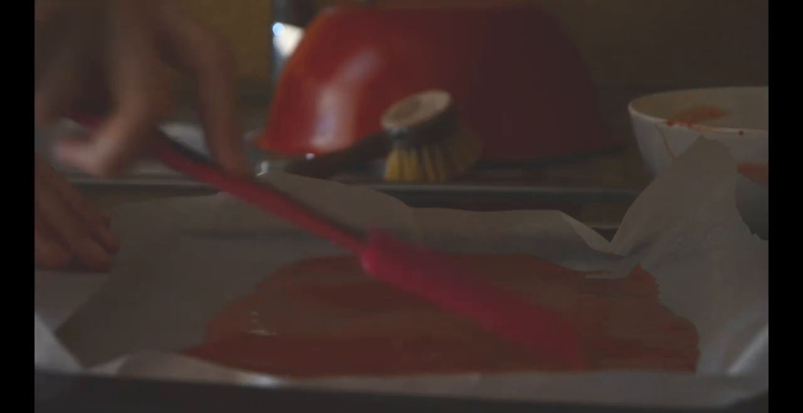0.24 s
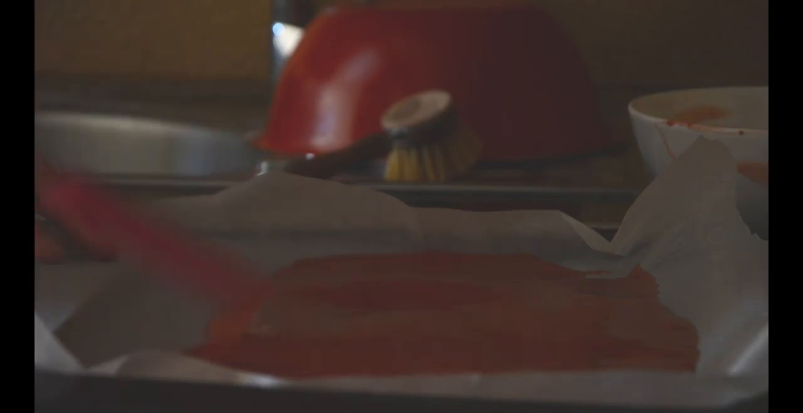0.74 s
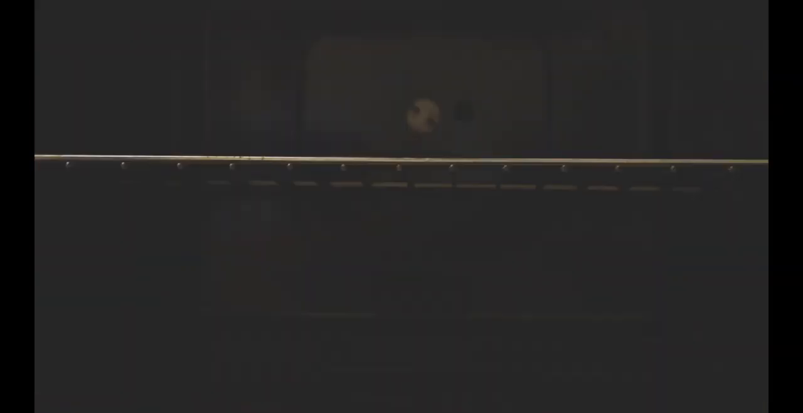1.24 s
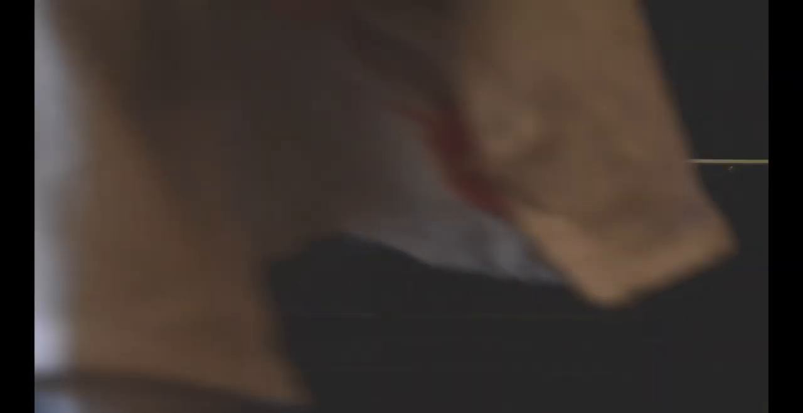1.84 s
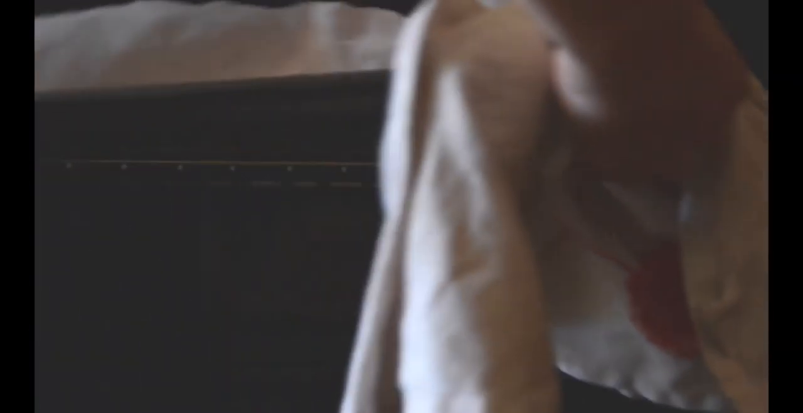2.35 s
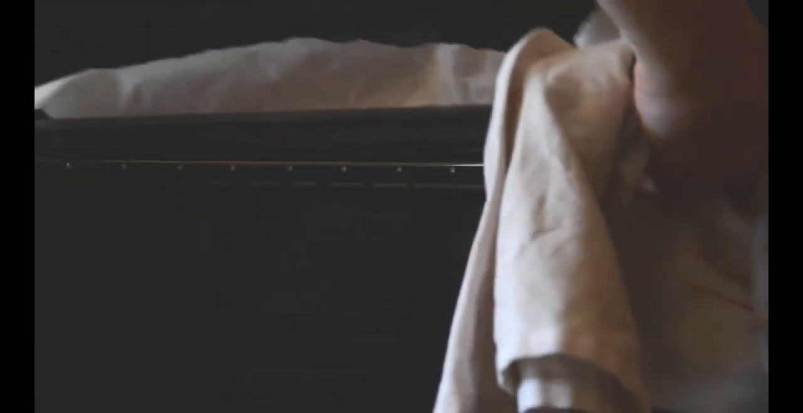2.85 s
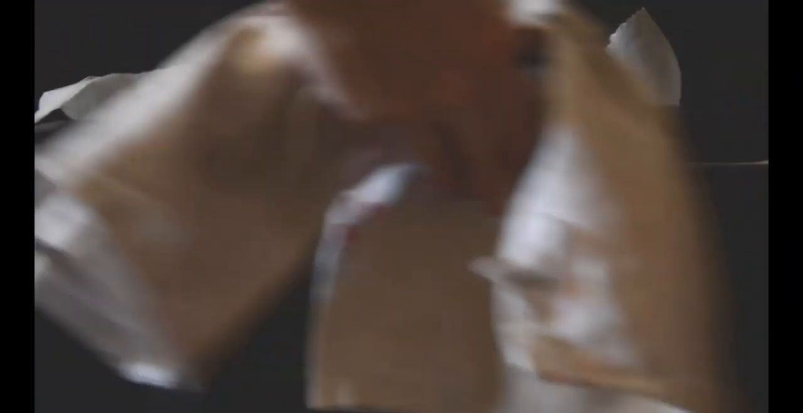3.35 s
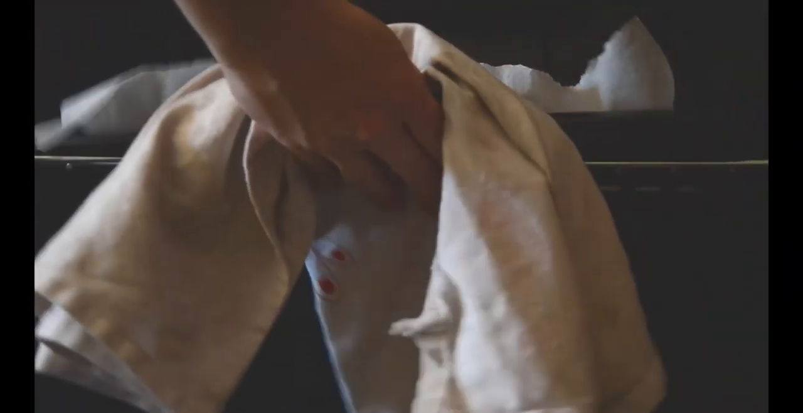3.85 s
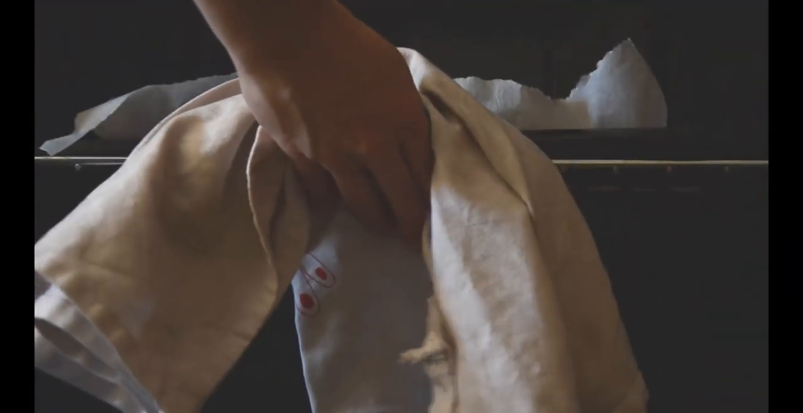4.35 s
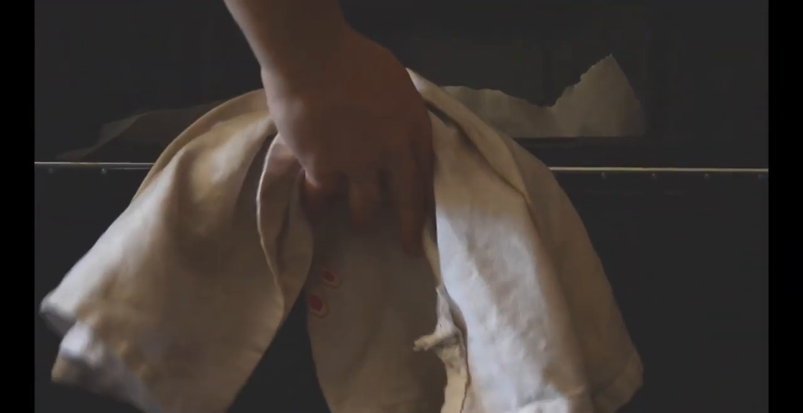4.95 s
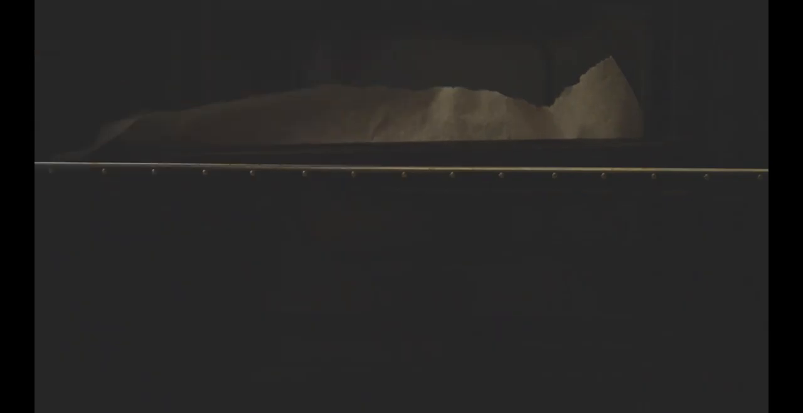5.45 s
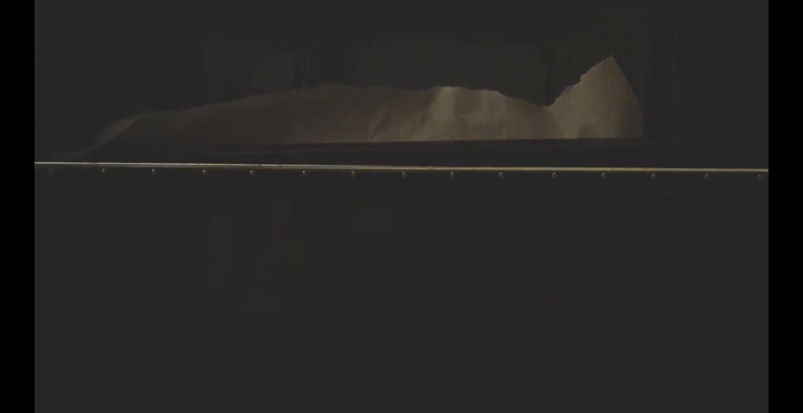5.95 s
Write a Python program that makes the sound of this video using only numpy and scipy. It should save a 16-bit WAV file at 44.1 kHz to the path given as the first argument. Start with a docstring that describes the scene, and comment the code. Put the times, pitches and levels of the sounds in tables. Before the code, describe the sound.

Faint dabs in a quiet kitchen cut to oven fan hush; a thin tray bangs, rattles, slides over rods and ends with a loud clank.

```python
"""A spatula pats a paste on baking paper; then a metal tray is set on an oven rack, rattles and slides over
the rods and clanks home. One contact force, made of blows and drags, shakes tray sheet, rim and oven walls;
bars, rods, squeals and the clank ring beside them, and cloth and hand brush the oven front.
The scene cuts from the hush at the counter to the open oven with its fan; a thin electric whine lies below
throughout. Noises are filtered and shaped; modes are resonators set ringing."""
import sys
import numpy as np
from scipy import signal
from scipy.fft import rfft, irfft, next_fast_len
from scipy.io import wavfile

SR = 44100
rng = np.random.default_rng(int(sys.argv[2]) if len(sys.argv) > 2 else 0)


def boost(x):
    """Linear amplitude factor 10**(x/20) for a level x in decibels (scalar or array-like)."""
    u = np.asarray(x, float) / 20
    return 10 ** u


def store_wav(level_fs):
    """Save 16-bit WAV to argv[1]."""
    pcm = np.round(np.clip(np.atleast_2d(level_fs), -1, 1) * 32767)
    wavfile.write(sys.argv[1], SR, pcm.T.astype(np.int16))


N = 273810
T = np.arange(N) / SR   # s

# All levels are relative, ahead of the final recording gain.
# Metal blows on metal. Each row: start in seconds, force in dB, hardness in dB per octave, oven share in dB.
BLOWS = [(2.0301, -42.5, 2, -9), (2.1003, -16, 1.75, -8), (2.1382, -27.5, -0.6, -2),
         (2.1913, -30.5, -0.6, -7), (2.398, -29, 0, 4), (2.4549, -11.5, 1.3, -4), (2.4935, -25, 5.5, -2.5),
         (2.567, -16.5, 3, 4.5), (2.585, -14, 3, -7), (2.6351, -17, 2.5, -1.5), (2.6937, -18.5, 2.3, -18),
         (2.9438, -31, 0, -19), (2.9907, -41, 0.8, 5), (3.6393, -56, 2, 6), (3.7587, -41, 1, 10),
         (3.8786, -16, 2, 9), (3.8814, -10.5, 1.7, -5), (3.8947, -14.5, 5, -1), (3.9095, -17, 3.5, -24),
         (3.9542, -22.5, 2.2, 5), (3.9837, -22.5, 2.5, -2), (4.0188, -33, 4, 11.5), (4.0836, -27, 2.5, 9),
         (4.119, -36, -5.5, 7), (4.3032, -35, -2.7, -1), (4.346, -35, -1, 3), (4.8411, -5, -0.7, -7)]
# Three strokes of the tray over the rods.
# Each row of a stroke: time in seconds, force on the sheet in dB, push on the cross-bars in dB.
DRAGS = [
    [(2.47, -18.5, -99), (2.522, -45, -89), (2.558, -33, -82), (2.67, -31.5, -82), (2.79, -43, -71),
     (2.94, -46.5, -102), (3.0, -57.5, -74), (3.12, -77, -108), (3.264, -73, -92), (3.33, -72, -105)],
    [(3.34, -72, -97), (3.53, -59, -98.5), (3.604, -69, -105), (3.64, -57, -85), (3.686, -46, -90),
     (3.786, -47, -82.5), (3.83, -49, -94), (3.87, -39, -77)],
    [(3.9, -27, -63), (4.026, -33.5, -69), (4.058, -49.5, -75.5), (4.208, -62, -100), (4.256, -52, -86),
     (4.35, -43.5, -82), (4.43, -43, -102), (4.49, -42, -91), (4.6, -42, -100), (4.69, -40.5, -85),
     (4.784, -44, -101), (4.81, -39.5, -83), (4.83, -53, -88)],
]
# Hardness of each stroke at a force of -40 dB. Each entry: hardness in dB per octave.
DRAG_HARD_DB = [2, 1.5, 3]
DRAG_HARD_PER_DB = 0.2004   # a harder push scrapes brighter: dB per octave, per dB of force
# Share of each stroke that reaches the oven walls. Each entry: share in dB.
DRAG_OVEN_DB = [2.5, 2, 0]
# A contact lasts longer the softer it is; it opens with one clean click, then grits.
CONTACT_DECAY_MS, CONTACT_DECAY_MS_PER_DB = 2.25, 0.09765
FIRST_TOUCH_DB, GRIT_DB = 14, 3
RATTLE_DB, RATTLE_HZ = 5, 45   # the dragged tray hops, so its force comes in clumps

# Energy that the tray sheet gives back. Each row: frequency in Hz, relative level in dB per Hz.
TRAY = [(35, -38), (60, -62), (146, 4.5), (202, -9), (307, -4), (406, -5), (436, 0), (501, -15.5), (563, 0),
        (986, -4.5), (1220, -0.5), (2950, -19), (6230, -49), (12000, -51.5), (15800, -73)]
# Slow dying away of sheet and oven together. Each row: frequency in Hz, t60 in seconds.
TRAY_T60 = [(80, 0.41), (250, 1), (700, 0.68), (1800, 0.5), (4500, 0.33), (9000, 0.091), (15000, 0.21)]
EDGES = 50 * 2 ** np.arange(0, 8.4, 1 / 3)   # third-octave edges of the sheet, Hz
# Clearest modes of the tray rim. Each row: frequency in Hz, level in dB, t60 in seconds.
RIM = [(555.4, 0, 0.52), (731, 0, 0.45), (1171, -4, 0.39), (1400, -5, 0.23), (1427, -6, 0.23),
       (1843, -1.5, 0.36), (2018, -1.5, 0.14), (3150, -34, 0.22), (3720, -13.5, 0.15)]
# Oven walls. Each row: frequency in Hz, level in dB, t60 in seconds.
OVEN = [(139, -7, 0.25), (162, -18.5, 0.35), (161, 2.5, 0.49), (208, -24, 0.94), (239, -6, 1),
        (256.8, -11.5, 0.99), (312.8, 5.5, 0.21)]
# Cross-bars that hum under the drag. Each row: frequency in Hz, level in dB, t60 in seconds.
BARS = [(454.4, 4.5, 0.5), (450.5, 3.5, 0.53), (485, -6.5, 0.81), (429, -9, 0.19)]
HUM_FLUTTER_DB, HUM_FLUTTER_HZ = 2.5, 16   # the tray weighs on the bars, then lets go
# Rods caught by the tray rim. Each row: start in seconds, level in dB, hardness in dB per octave.
PLUCKS = [(2.85, -42.5, 3.5), (2.95, -54, 22.5), (3.09, -73, 8), (4.2, -47.5, -14)]
# Thin rods left ringing, as paired modes.
# Each row: first frequency in Hz, level in dB, t60 of the first mode in seconds.
RODS = [(750, -3, 2.34), (1120, -9.5, 2.2), (1565, -6.5, 2.4)]
# Rack against the back wall. Each row: start in seconds, level in dB.
CLANK = [(4.8411, -5.5), (4.845, -2.5), (4.8472, -7)]
# Back wall with its short dull knock, as paired modes.
# Each row: first frequency in Hz, level in dB, t60 of the first mode in seconds.
BACK_WALL = [(660, 2, 0.067), (758, -10.5, 0.12), (336, -19, 0.25), (1400, -5.5, 0.034), (2060, -19.5, 0.1),
             (144.5, -20.5, 1.75), (176.8, -33, 1.13), (233, -31, 1.76), (286.4, -33.5, 1.01),
             (467, -37, 1.05), (598, -23.5, 1.08), (680, -25, 1.52), (700, -15.5, 0.59), (788, -30.5, 0.91),
             (865, -20.5, 0.5), (930, -30.5, 0.7), (1092, -20, 0.35), (1120, -27.5, 1.15), (1500, -28, 0.2)]
LOOSE_DB, LOOSE_HZ = 3, 22   # loose panels make each wall mode waver, less so if its t60 is under 1 s
# Stick-slip squeals, high. Each row: start in seconds, length in seconds, top level in dB,
# first frequency in Hz, last frequency in Hz.
SQUEALS = [(4.525, 0.125, -45.5, 1260, 1225), (4.67, 0.14, -44.5, 1258, 1188)]
# Stick-slip groans, low. Each row: start in seconds, length in seconds, top level in dB,
# first frequency in Hz, last frequency in Hz.
GROANS = [(3.86, 0.11, -29.5, 157, 154.5), (4.27, 0.1, -44, 246, 256), (4.41, 0.095, -45.5, 248.5, 246)]
SWELL_DB, BREAK_S = 3, 0.025

# Spatula on paper. Each row: start in seconds, level in dB, centre in Hz, t60 in seconds.
PATS = [(.049, -56.5, 2540, 0.25), (.199, -54, 1400, 0.13), (.351, -50, 1400, 0.099),
        (0.516, -57.5, 2340, .25), (.636, -56.5, 1130, 0.5), (0.704, -53.5, 1670, 0.2),
        (.808, -45.5, 1600, 0.18), (1.061, -56, 1490, 0.44)]
PAT_OCTAVES, PAT_DULL_DB, PAT_RISE_CYCLES = 1.17, -10.5, 1.5
# Cloth and hand brushing the oven front.
# Each row: start in seconds, level in dB, centre in Hz, t60 in seconds.
TOUCHES = [(1.39, -68, 596, 0.34), (1.45, -57, 854, 0.38), (1.585, -55.5, 590, 0.47),
           (1.962, -54, 1500, 0.083), (5.693, -45.5, 1210, 0.28), (5.958, -48.5, 750, 0.06),
           (6.087, -51, 600, 0.44)]
TOUCH_OCTAVES, TOUCH_DULL_DB, TOUCH_RISE_CYCLES = 0.9, 0.5, 1.9

# A late soft knock on the door frame: its time and level.
KNOCK_S, KNOCK_DB = 5.7, -43
# Door frame, as paired modes.
# Each row: first frequency in Hz, level in dB, t60 of the first mode in seconds.
FRAME = [(626, -4, 0.32), (1285, -1.6, 0.36)]
# Cloth drawn off the rim: starts, fades and sinks.
CLOTH_S, CLOTH_RISE_S, CLOTH_HOLD_S, CLOTH_FADE_S = 5.102, 0.029, 0.31, 0.21
CLOTH_DB, CLOTH_SAG_DB = -67, 3.5
CLOTH_HZ, CLOTH_SINK_HZ_PER_S = 4600, 1500
CLOTH_BODY_DB, CLOTH_BODY_HZ = 15.1, 1500   # dull rustle under the hiss
# Shudder of the oven body: resting level, share of a blow's force, dying away, rise.
RUMBLE_REST_DB, RUMBLE_SHARE_DB, RUMBLE_T60_S, RUMBLE_RISE_S = -73, -45, 1.9, 0.044

CUT_S = 1.17   # the scene cuts from the counter to the oven
# Air at the open oven. Each row: frequency in Hz, relative level in dB per Hz.
FAN = [(26, -22), (45, -8.5), (53, -9.5), (116, -0.5), (189, -4.5), (229, 1), (292, -6), (719, -3),
       (1200, -7.5), (2250, -11), (2480, -14.5), (3020, -14.5), (4450, -27), (11500, -36), (15000, -40)]
# Faint whistles of the fan. Each row: frequency in Hz, level in dB, half width in Hz.
WHISTLES = [(2920, -72, 86), (2230, -73.5, 55), (227, -74, 15)]
# Hush at the counter. Each row: frequency in Hz, relative level in dB per Hz.
COUNTER = [(26, -33), (45, -8), (55, -15), (180, -1.5), (453, -5.5), (939, -3), (1810, -7), (2480, -11.5),
           (2870, -8), (3410, -18), (5670, -26.5), (11500, -33), (15000, -43)]
FAN_DB, COUNTER_DB = -57, -58.5
# Electric whine. Each row: frequency in Hz, level in dB.
WHINE = [(15703, -80.5)]


def rms_one(x):
    """Scale to rms 1."""
    return x / np.sqrt(np.mean(x ** 2) + 1e-20)


def at_hz(points, hz):
    """Read a (Hz, value) table on a log frequency axis."""
    table = np.array(points)
    return np.interp(np.log(hz), np.log(table[:, 0]), table[:, 1])


def band(x, low, high):
    """Butterworth band-pass."""
    sos = signal.butter(2, [low, min(high, .45 * SR)], "band", fs=SR, output="sos")
    return signal.sosfilt(sos, x)


def flutter(depth_db, rate_hz):
    """Randomly wavering gain of mean power 1."""
    knots = np.arange(0, T[-1] + 1, 1 / 100)
    memory = np.exp(-2 * np.pi * rate_hz / 100)
    slow = rms_one(signal.lfilter([1], [1, -memory], rng.standard_normal(len(knots))))
    return rms_one(boost(depth_db * np.interp(T, knots, slow)))


def chatter(per_s, spread_db):
    """Random micro-contacts of uneven size and sign; rms 1."""
    sizes = boost(spread_db * np.minimum(rng.exponential(1, N), 4)) * rng.choice([-1, 1], N)
    return rms_one(sizes * (rng.random(N) < per_s / SR))


def ring(force, hz, t60):
    """A damped resonator: a unit click sets a sine of height 1 ringing."""
    r = boost(-60 / (t60 * SR))
    w = 2 * np.pi * hz / SR
    return signal.lfilter([0, np.sin(w)], [1, -2 * r * np.cos(w), r * r], force + 1e-18)


def modes(force, table):
    """Each mode is driven with a strength that wanders as the contact point moves."""
    out, knots = 0, np.arange(0, T[-1] + 1, .06)
    for hz, level_db, t60 in table:
        wander_db = np.interp(T, knots, 2.8 * rng.standard_normal(len(knots)))
        out = out + ring(force * boost(level_db + wander_db), hz, t60)
    return out


def struck(times, levels_db, hz, t60):
    """A close pair of modes struck at given moments; the pair beats, so the ring flutters."""
    clicks = np.zeros(N)
    clicks[np.round(times * SR).astype(int)] = boost(levels_db)
    first = 0.85 * ring(clicks, hz, t60)
    return first + 0.086 * ring(clicks, hz * rng.uniform(1.004, 1.014), 1.65 * t60)


def rough_tone(rows, width_hz):
    """A narrow gliding resonance: slow noise riding a tone; rows of (s, dB, Hz)."""
    s, level_db, hz = np.transpose(rows)
    tone = np.sin(2 * np.pi * np.cumsum(np.interp(T, s, hz)) / SR)
    rough = rms_one(band(rng.standard_normal(N), 3.3, width_hz) * tone)
    return boost(np.interp(T, s, level_db, -120, -120)) * rough


def metal():
    """Sheet, walls and rim share one contact force; bars, rods, squeals, groans and clank sound beside them."""
    force, hum, (hard, oven_db) = contacts()
    out = sheet(force, hard)
    out += modes(force * boost(oven_db - 46.5), OVEN)
    out += modes(force * boost(-43.5), RIM)
    out += flutter(HUM_FLUTTER_DB, HUM_FLUTTER_HZ) * modes(hum, BARS)
    out += rods() + clank() + stick_slip(SQUEALS, width_hz=30) + stick_slip(GROANS, width_hz=13.4)
    # the metal sounds nothing below about 100 Hz
    return signal.sosfilt(signal.butter(4, 105, "high", fs=SR, output="sos"), out)


def contacts():
    """Force on the metal, push on the bars, and sample by sample the force's hardness and oven share."""
    force, hum, controls = np.zeros(N), np.zeros(N), np.zeros((2, N))
    for rows, hard_db, oven_db in zip(DRAGS, DRAG_HARD_DB, DRAG_OVEN_DB):
        s, level_db, hum_db = np.transpose(rows)
        on = (T >= s[0]) & (T < s[-1])
        push_db = np.interp(T[on], s, level_db)
        force[on] = boost(push_db)
        hum[on] = boost(np.interp(T[on], s, hum_db))
        controls[0, on] = hard_db + DRAG_HARD_PER_DB * (push_db + 40)
        controls[1, on] = oven_db
    slips = chatter(2000, 3.9)
    force *= slips * flutter(RATTLE_DB, RATTLE_HZ)
    grit = chatter(6000, 1.7)
    for s, level_db, hard, oven_db in BLOWS:
        decay_ms = max(CONTACT_DECAY_MS - CONTACT_DECAY_MS_PER_DB * level_db, .25)
        after = np.arange(int(4 * decay_ms * SR / 1000)) / SR
        at = round(s * SR) + np.arange(len(after))
        force[at] += boost(level_db + GRIT_DB) * np.exp(-1000 * after / decay_ms) * grit[at]
        force[at[0]] += boost(level_db + FIRST_TOUCH_DB)
        controls[:, at] = [[hard], [oven_db]]
    return force, hum * slips, controls


def sheet(force, hard):
    """Countless close modes: each third-octave answers with noise dying fast at first, then slowly."""
    size, after = next_fast_len(N + SR), T[:SR]
    total, energy = 0, 0
    white = rng.standard_normal((2, 3, SR))
    # contacts fall on three spots of the sheet, each with an answer of its own
    spots = rng.integers(0, 3, N) == np.arange(3)[:, None]
    for k, (low, high) in enumerate(zip(EDGES, EDGES[1:])):
        hz = np.sqrt(low * high)
        decay = boost(-60 * after / at_hz(TRAY_T60, hz)) + 0.6 * boost(-60 * after / 0.03)
        answers = band(white[k % 2] * decay, low, high)
        gain = boost(at_hz(TRAY, hz)) * np.sqrt(high - low)
        energy += gain ** 2
        answers *= gain / np.sqrt(np.sum(answers ** 2, axis=1, keepdims=True))
        # hardness tilts the push about 1 kHz
        pushes = spots * force * boost(hard * np.log2(hz / 1000))
        total = total + np.sum(rfft(pushes, size) * rfft(answers, size), axis=0)
    return irfft(total, size)[:N] / np.sqrt(energy)


def clank():
    """The rack stops against the back wall and bounces twice: a dull knock and a short bright crack."""
    s, level_db = np.transpose(CLANK)
    wall = 0
    for hz, db, t60 in BACK_WALL:
        wall = wall + flutter(LOOSE_DB * min(t60, 1), LOOSE_HZ) * struck(s, level_db + db, hz, t60)
    after = np.maximum(T - s[1], 0)
    fading = (T > s[1]) * (boost(-60 * after / 0.022) + 0.29 * boost(-60 * after / 0.19))
    crack = boost(level_db[1] - 35) * fading * rms_one(band(rng.standard_normal(N), 5230, 12000))
    return signal.sosfilt(signal.butter(1, 2400, fs=SR, output="sos"), wall) + crack


def rods():
    """Plucked thin rods ring on; hardness tilts each catch towards the higher or the lower rods."""
    s, level_db, hard = np.transpose(PLUCKS)
    return sum(struck(s, level_db + db + hard * np.log2(hz / 1000), hz, t60) for hz, db, t60 in RODS)


def stick_slip(table, width_hz):
    """Each friction spell sets in, swells while its pitch glides, and breaks off."""
    out = 0
    for s, length, db, first, last in table:
        end = s + length
        rows = [(s - 2 * BREAK_S, db - 60, first), (s - BREAK_S, db - SWELL_DB - 12, first),
                (s, db - SWELL_DB, first), (end - BREAK_S, db, last),
                (end, db - 9, last), (end + BREAK_S / 2, db - 60, last)]
        out = out + rough_tone(rows, width_hz)
    return out


def pats(table, octaves, dull_db, rise_cycles):
    """Short rustling touches: a dull part below, a crisp tick on top; low ones rise more slowly."""
    out, after = np.zeros(N + SR), T[:SR // 2]
    half = 2 ** (max(octaves, .2) / 2)
    for s, level_db, hz, t60 in table:
        noise = rng.standard_normal((3, len(after)))
        bright = rms_one(band(noise[0], hz / half, hz * half))
        dull = boost(dull_db) * rms_one(band(noise[1], 273, 870))
        tick = boost(-30.5 + 10.0 * octaves) * rms_one(band(noise[2], 3500, 14000))
        tick *= boost(-60 * after / .2)
        shape = (1 - np.exp(-after * hz / rise_cycles)) * boost(-60 * after / max(t60, .02))
        at = round(s * SR)
        out[at:at + len(after)] += boost(level_db) * shape * (bright + dull + tick)
    return out[:N]


def knock():
    """The door frame, struck once, rings faintly."""
    return sum(struck(np.array([KNOCK_S]), KNOCK_DB + db, hz, t60) for hz, db, t60 in FRAME)


def cloth():
    """Friction hiss: two narrow and one broad sinking resonance over a dull rustle of steady pitch."""
    s = np.cumsum([0, CLOTH_RISE_S, CLOTH_HOLD_S, CLOTH_FADE_S])
    level_db = CLOTH_DB - np.array([17, 0, CLOTH_SAG_DB, 12])
    rows = np.transpose([CLOTH_S + s, level_db, CLOTH_HZ - CLOTH_SINK_HZ_PER_S * s])
    lower = rows * [1, 1, .79] - [0, 4.0, 0]
    broad = rows - [0, 3.0, 0]
    body = rows * [1, 1, 0] + [0, CLOTH_BODY_DB, CLOTH_BODY_HZ]
    hiss = boost(-1.6) * flutter(3.1, 11) * rough_tone(rows, width_hz=140)
    hiss += rough_tone(lower, width_hz=190) + rough_tone(broad, width_hz=1400)
    return hiss + flutter(2.1, 14) * rough_tone(body, width_hz=490)


def rumble():
    """At the oven, its body shudders a little all the time and more after every blow: low band noise."""
    power = boost(RUMBLE_REST_DB) ** 2 * (T > CUT_S)
    for s, level_db, *_ in BLOWS:
        after = np.maximum(T - s, 0)
        fading = boost(level_db + RUMBLE_SHARE_DB - 60 * after / RUMBLE_T60_S)
        power = power + (fading * (1 - np.exp(-after / RUMBLE_RISE_S))) ** 2
    return np.sqrt(power) * rms_one(band(rng.standard_normal(N), 71, 100))


def hush(spectrum):
    """Steady noise of a given colour; rms 1."""
    hz = np.maximum(np.arange(N // 2 + 1) * SR / N, 1)
    return rms_one(irfft(rfft(rng.standard_normal(N)) * boost(at_hz(spectrum, hz)), N))


def fan():
    """Air noise with a few faint whistles, each a tone roughened by slow noise."""
    whistles = sum(rough_tone([(0, db, hz), (7, db, hz)], width) for hz, db, width in WHISTLES)
    return boost(FAN_DB) * hush(FAN) + whistles


def counter():
    """The kitchen hush at the counter: steady coloured noise."""
    return boost(COUNTER_DB) * hush(COUNTER)


def whine():
    """A thin, steady electric sine."""
    return sum(np.sqrt(2) * boost(db) * np.sin(2 * np.pi * hz * T) for hz, db in WHINE)


def scene():
    """Sum of the sources; the background switches at once where the scene cuts from counter to oven."""
    spatula = pats(PATS, PAT_OCTAVES, PAT_DULL_DB, PAT_RISE_CYCLES)
    brushing = pats(TOUCHES, TOUCH_OCTAVES, TOUCH_DULL_DB, TOUCH_RISE_CYCLES)
    floor = np.where(T > CUT_S, fan(), counter())
    return (metal() + spatula + brushing + knock() + cloth() + rumble() + floor + whine())[None]


def top_cut(x):
    """Nothing passes above the cut-off."""
    return signal.sosfilt(signal.butter(12, 15990, fs=SR, output="sos"), x)


def record(dry):
    """Loud peaks are rounded and a small constant offset is added."""
    mix = 0.68 * np.tanh(dry / 0.93) + 0.00062
    return top_cut(mix)


dry = scene()
out = record(dry)
store_wav(out)
```